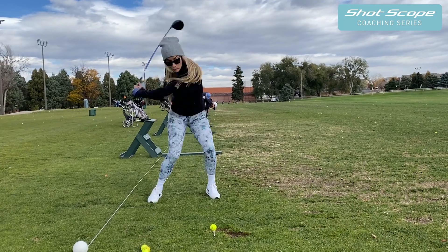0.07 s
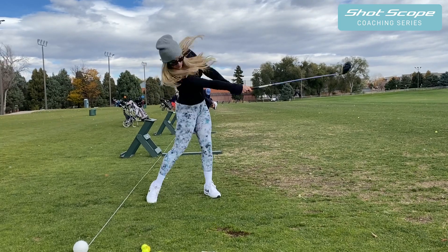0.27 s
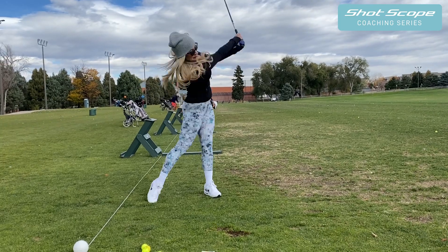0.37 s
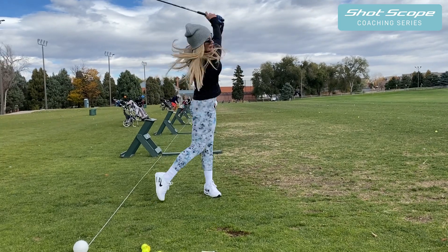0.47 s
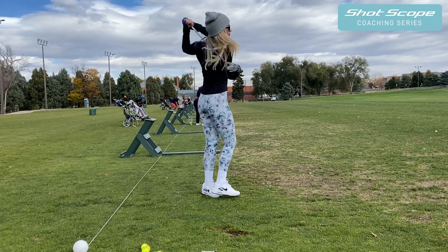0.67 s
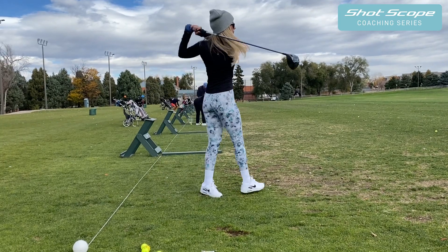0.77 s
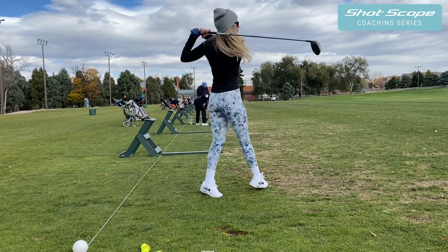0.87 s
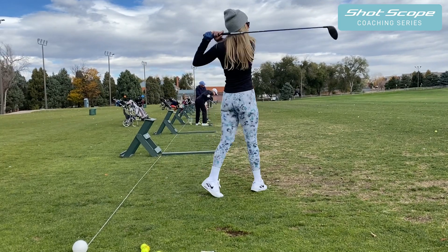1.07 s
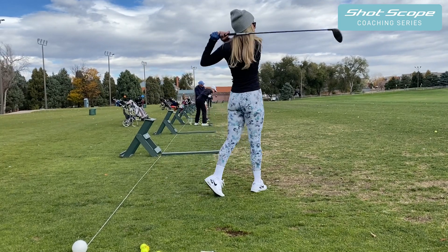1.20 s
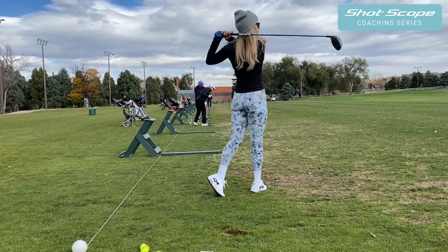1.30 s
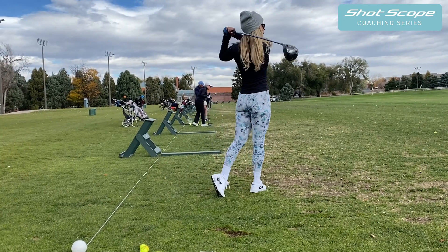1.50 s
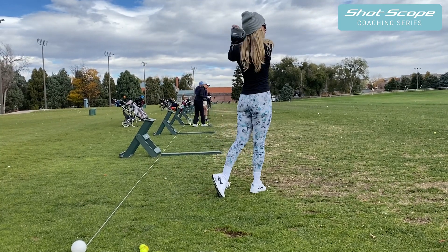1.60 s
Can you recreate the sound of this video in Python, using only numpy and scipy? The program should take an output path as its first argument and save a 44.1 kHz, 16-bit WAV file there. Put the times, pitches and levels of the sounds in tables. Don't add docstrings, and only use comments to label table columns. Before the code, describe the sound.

A golf driver strikes a teed ball outdoors. From 0.1 s a short whoosh rises, then at 0.21 s comes a loud, dry, bright crack with a very short hollow metal ring. A faint tee flutter follows until 0.3 s, and a soft grainy tree echo from 0.33 s. Tiny ticks scatter from 0.65 to 1.13 s over faint, slowly fading traffic rumble and hiss; slight rustle at 1.64 s.

```python
import sys
import numpy as np
from scipy import signal
from scipy.fft import rfft, irfft
from scipy.io import wavfile

SR = 44100
rng = np.random.default_rng(int(sys.argv[2]) if len(sys.argv) > 2 else 0)


def unload_wav(signal):
    wavfile.write(
        sys.argv[1],
        SR,
        np.round(np.clip(np.atleast_2d(signal).T, -1, 1) * 32767).astype(np.int16),
    )


def invert_db(level):
    return 10 ** (np.asarray(level, dtype=float) / 20)


N = 72765
TIME_S = np.arange(N) / SR
HIT_S = .21162

# pitch_hz, level_db, t60_s, left_right_db, rise_ms
HEAD_MODES = [(6500, -8, 0.044, 7, 1.3), (6290, -17.5, .07, 3, 3.5), (4302, -12, 0.049, 2.7, 1.4),
              (3990, -24, .08, -0.2, 2.6), (3350, -14.5, 0.053, 0, 6.5), (5773, -18, .05, 2, .7),
              (7640, -28, 0.11, 4.5, 1.7), (9060, -23, 0.052, -1.6, 0.49), (10350, -23, .05, -4, 0.52),
              (11800, -26, .04, -3.5, .35), (13250, -28, .04, 0.7, .35), (14080, -27.5, .04, 0.3, .35),
              (15250, -31, .03, -0.3, .35), (1290, -29.5, .04, -0.1, .35)]
# freq_hz, level_db
CRACK_SPECTRUM = [(300, -12.5), (1400, -2.5), (2900, -10.5), (3700, -3.5), (5200, -1.5), (9000, -4),
                  (12500, -4.5), (16000, -17)]
# freq_hz, level_db
TURF_SPECTRUM = [(400, -5), (2400, -13), (3200, 0), (4200, 0.07), (5600, -5), (8500, -15.5), (10000, -5.5),
                 (16000, -22)]
# start_s, length_s, pitch_hz, level_db, left_right_db
TEE_TUMBLES = [
    (.226, .027, 2055, -32.5, 1),
    (.253, .03, 2025, -39, 2.4),
    (.28, 0.045, 2050, -50, .1),
    (.232, .024, 6070, -44, 13),
    (.255, .066, 6085, -49.5, -4.5),
]
# time_s, level_db, vortex_pitch_hz
SWING_PATH = [
    (.105, -71, 430),
    (.134, -46.5, 590.7),
    (.166, -38.5, 759.3),
    (.18, -35.5, 817.3),
    (.195, -34.5, 760),
    (.207, -36, 735),
    (.228, -48, 518),
    (.285, -67.5, 420),
]
# freq_hz, level_db
SWISH_SPECTRUM = [(880, -33), (1500, -7), (2970, -10.5), (3620, -6.5), (5660, -7.5), (8240, -18.5),
                  (10500, -13.5), (16000, -38)]
# start_s, level_db, t60_s
ECHO_ARRIVALS = [
    (0.326, -55, 0.19),
    (0.372, -52, 0.39),
    (.64, -72.5, .9),
]
# freq_hz, level_db
ECHO_SPECTRUM = [(700, -4), (3300, -15), (3850, -14), (4300, -12.5), (5150, -9.5), (5930, 1.5), (6500, -12),
                 (13000, -29.5)]
# start_s, peak_db, pitch_hz
TICK_EVENTS = [(0.651, -60, 3206), (.690, -55, 3620), (0.704, -54, 1690), (.712, -59, 10500),
               (.734, -59, 3160), (0.742, -56, 6500), (.767, -57, 2430), (.786, -62, 6800),
               (.861, -59, 3472), (0.8703, -57, 3020), (.968, -60.5, 2300), (1.0062, -56, 3330),
               (1.1283, -52.5, 3260)]
# time_s, level_db
TRAFFIC_SWELL = [
    (0.0, 3),
    (.5, 1),
    (.75, 0.7),
    (1.2, -0.5),
    (1.65, -1.2),
]
# freq_hz, level_db
RUMBLE_SPECTRUM = [(25, -13.5), (54, -1.5), (170, -0.2), (255, -5.5), (340, -14.5), (400, -15),
                   (1080, -22.5), (2600, -42.5)]
# freq_hz, left_right_likeness (1 = identical)
LIKENESS = [(60, .98), (200, .97), (380, .88), (700, .35), (1300, 0.48), (2400, 0.31), (4400, .67),
            (12000, 1)]
# freq_hz, level_db
HISS_SPECTRUM = [(1600, 1), (2300, 0.3), (3150, 5), (4200, -0.1), (8000, -2.7), (16000, -5)]


def rms_one(x):
    return x / np.sqrt(np.mean(x ** 2) + 1e-20)


def in_time(rows):
    s, *columns = np.transpose(rows)
    return [np.interp(TIME_S, s, column) for column in columns]


def at_hz(points, hz):
    freq_hz, value = np.transpose(points)
    return np.interp(np.log(hz), np.log(freq_hz), value)


def smooth(x, hz):
    r = np.exp(-2 * np.pi * hz / SR)
    return signal.lfilter([1 - r], [1, -r], x)


def drift(hz):
    white = rng.standard_normal(N + SR)
    return rms_one(smooth(smooth(white, hz), hz)[SR:])


def panned(left_right_db):
    return invert_db([[left_right_db / 2], [-left_right_db / 2]])


def noise(spectrum, likeness):
    hz = np.arange(1, N // 2 + 2) * SR / N
    mid, side = rfft(rng.standard_normal((2, N)))
    alike = np.clip(at_hz(likeness, hz), -1, 1)
    inside = (hz > spectrum[0][0]) & (hz < spectrum[-1][0])
    both = np.sqrt(1 + alike) * mid + np.sqrt(1 - alike) * side * [[1], [-1]]
    return rms_one(irfft(both * invert_db(at_hz(spectrum, hz)) * inside, N))


def ring(start_s, hz, db, t60_s, rise_s, sag=0):
    sag_s = .025
    t = np.maximum(TIME_S - start_s, 0)
    cycles = hz * (t - sag * (t - sag_s * (1 - np.exp(-t / sag_s))))
    envelope = invert_db(db - 60 * t / t60_s) * (1 - np.exp(-t / rise_s))
    return envelope * np.sin(2 * np.pi * cycles)


def dying(start_s, db, t60_s):
    t = TIME_S - start_s
    return (t > 0) * invert_db(db - 60 * np.maximum(t, 0) / t60_s)


def ringing_head(left_lag_s):
    head = 0
    for hz, db, t60_s, left_right_db, rise_ms in HEAD_MODES:
        lag_s = left_lag_s * (1 if hz > 7000 else .22)
        ragged = invert_db(2.1 * drift(120))
        mode = ring(HIT_S + lag_s, hz, db, t60_s, rise_ms / 1000, sag=.03)
        head = head + panned(left_right_db) * ragged * mode
    turn_s, turn_width_s, turn_db = .2178, .0007, -4.5
    return head * invert_db(turn_db * (1 + np.tanh((TIME_S - turn_s) / turn_width_s)) / 2)


def strike():
    left_lag_s = np.array([[.00011], [0]])
    head = ringing_head(left_lag_s)
    snap = ring(HIT_S, 1530, -9, .0055, .0002)
    clack = ring(HIT_S, 3800, -5.5, .0041, .0001)
    thud = ring(HIT_S, 430, -23, .039, .001)

    turf_end_s = .27
    turf_fade = (1 - np.tanh((TIME_S - turf_end_s) / .012)) / 2
    turf_level = dying(HIT_S, -26, .13) * invert_db(3 * drift(70)) * turf_fade
    likeness = [(500, .8), (3000, .3), (9000, .05)]
    crack = noise(CRACK_SPECTRUM, likeness) * dying(HIT_S + left_lag_s, -16, .041)
    turf = noise(TURF_SPECTRUM, likeness) * turf_level
    return invert_db(-.36) * (head + snap - clack + thud) + crack + turf


def swing():
    db, hz = in_time(SWING_PATH)
    phase = 2 * np.pi * np.cumsum(hz) / SR
    width_hz, right_lag_samples = 224, 8

    def vortex_band():
        return rms_one(drift(width_hz) * np.cos(phase) + drift(width_hz) * np.sin(phase))

    shared, apart = vortex_band(), vortex_band()
    delayed = np.roll(shared, right_lag_samples)
    vortex = rms_one(np.array([shared, delayed]) + .25 * apart * [[1], [-1]])

    top_db = db.max()
    swish_db = top_db - 13 + 1.1 * (db - top_db) + 1.5 * drift(45)
    swish = invert_db(swish_db) * noise(SWISH_SPECTRUM, [(1000, .1), (16000, .3)])
    push = invert_db(db - 7.5) * noise([(60, -2), (170, -5), (330, -12)], LIKENESS)

    pass_s, pass_hz, pass_db, pass_length_s = .19, 702, -24.5, .0014
    t = TIME_S - pass_s
    strong = -invert_db(pass_db) * np.exp(-.5 * (t / pass_length_s) ** 2) * np.cos(2 * np.pi * pass_hz * t)
    gusty = invert_db(db + 1.74 * drift(30)) * vortex
    return panned(-1.9) * (gusty + strong) + swish + push


def tee():
    out = 0
    for start_s, length_s, hz, db, left_right_db in TEE_TUMBLES:
        part = np.clip((TIME_S - start_s) / length_s, 0, 1)
        swell = np.abs(np.sin(np.pi * part ** .33)) ** 1.2
        tone = np.sin(2 * np.pi * hz * length_s * part)
        out = out + panned(left_right_db) * invert_db(db) * swell * tone
    return out


def echo():
    scattered = noise(ECHO_SPECTRUM, [(1000, .27), (8000, .074)])
    sides = np.array([drift(120), drift(150)])
    grains = invert_db(3 * sides + 2.5 * drift(40))
    arrivals = sum(dying(*row) for row in ECHO_ARRIVALS)
    return scattered * grains * smooth(arrivals, 90)


def ticks():
    clicks = 0
    for start_s, peak_db, hz in TICK_EVENTS:
        for detune in rng.uniform(-.93, 1, 3):
            t60_s = 19 / hz
            clicks = clicks + ring(start_s, hz * (1 + .13 * detune), peak_db - 2, t60_s, .00042)
    rustle = dying(1.642, -68, .3) * noise([(300, 7), (2000, -2), (16000, -6.5)], LIKENESS)
    return clicks + rustle


def traffic():
    swell_db, = in_time(TRAFFIC_SWELL)
    return invert_db(-48.5 + swell_db + .6 * drift(9)) * noise(RUMBLE_SPECTRUM, LIKENESS)


def scene():
    return swing() + strike() + tee() + echo() + ticks() + traffic()


def top_cut(x):
    return signal.sosfilt(signal.butter(12, 16160, fs=SR, output="sos"), x)


def record(dry):
    knee_db, slope, most_cut_db = -29, 2.5, 6.5
    release_db_per_s, attack_s, hiss_db = 99.5, .017, -73
    fall_db = release_db_per_s * TIME_S
    level_db = 10 * np.log10(smooth(np.mean(dry ** 2, axis=0), 80) + 1e-12)
    held_db = np.maximum.accumulate(level_db + fall_db) - fall_db
    wanted_cut_db = np.clip(slope * (held_db - knee_db), 0, most_cut_db)
    cut_db = smooth(wanted_cut_db, 1 / (2 * np.pi * attack_s))
    swell_db, = in_time(TRAFFIC_SWELL)
    hiss = invert_db(hiss_db + .6 * swell_db - .3 * cut_db) * noise(HISS_SPECTRUM, LIKENESS)
    return top_cut(dry * invert_db(-cut_db) + hiss)


dry = scene()
out = record(dry)
unload_wav(out)
```